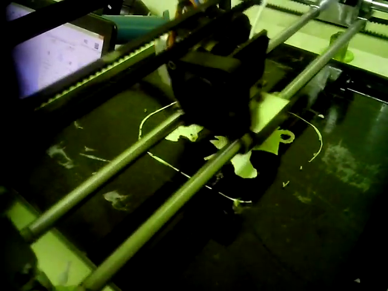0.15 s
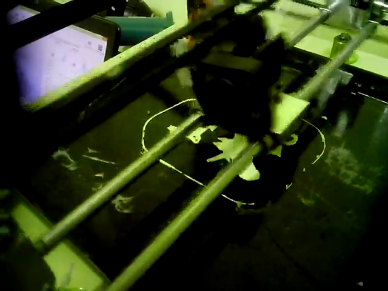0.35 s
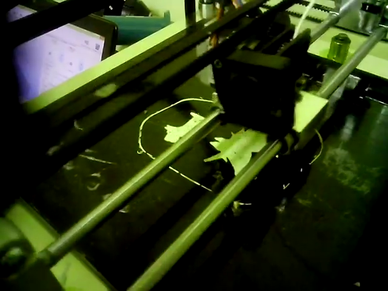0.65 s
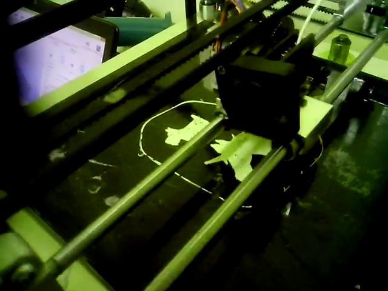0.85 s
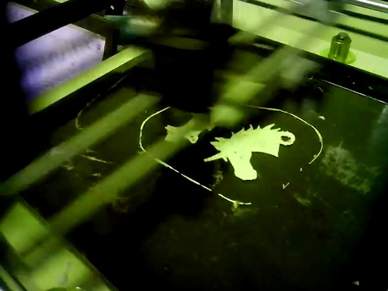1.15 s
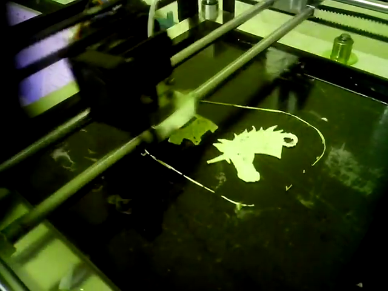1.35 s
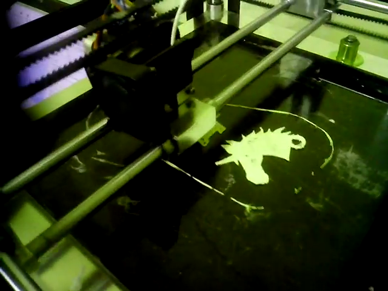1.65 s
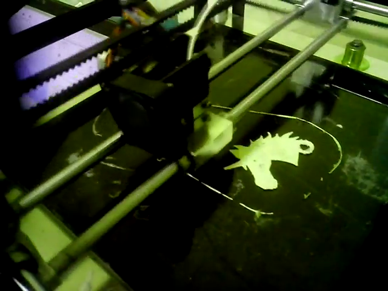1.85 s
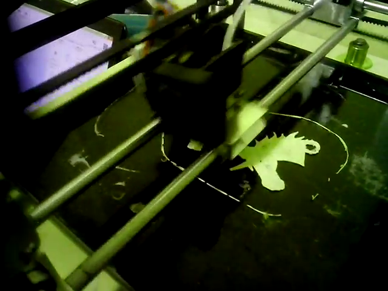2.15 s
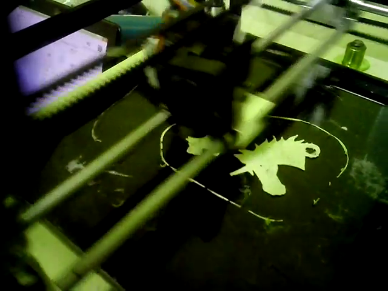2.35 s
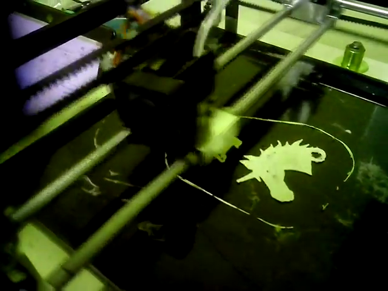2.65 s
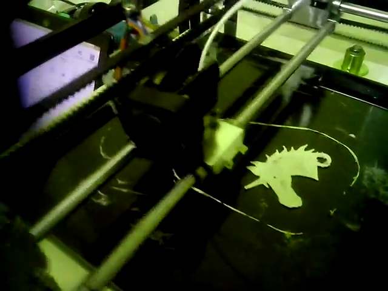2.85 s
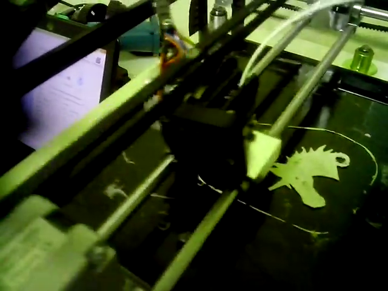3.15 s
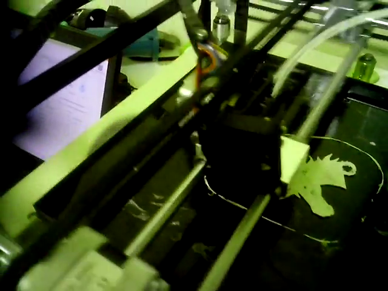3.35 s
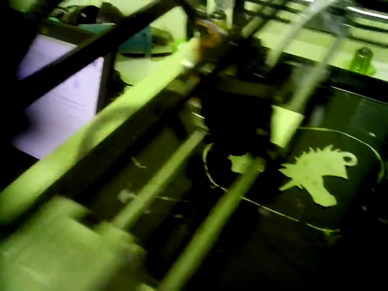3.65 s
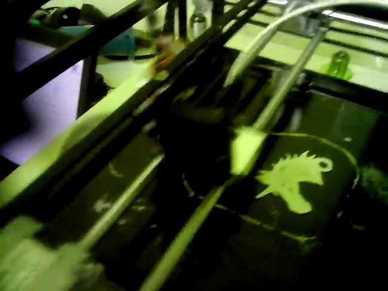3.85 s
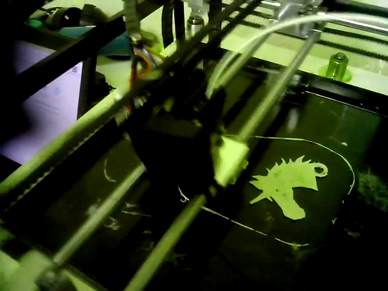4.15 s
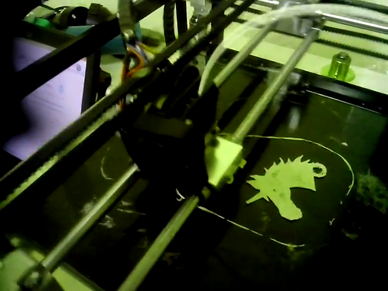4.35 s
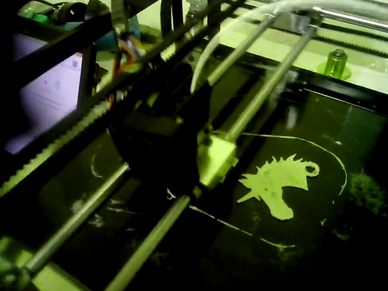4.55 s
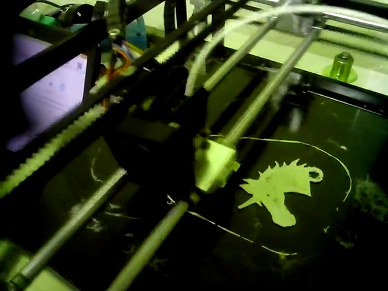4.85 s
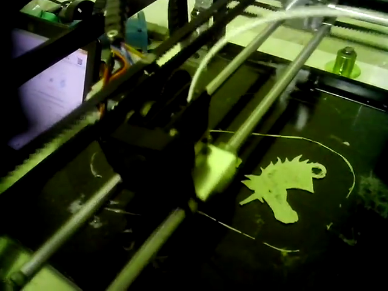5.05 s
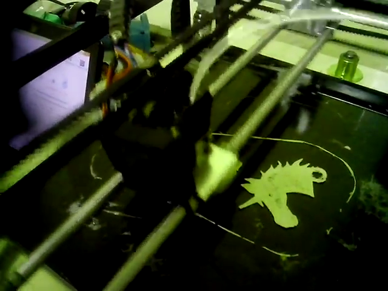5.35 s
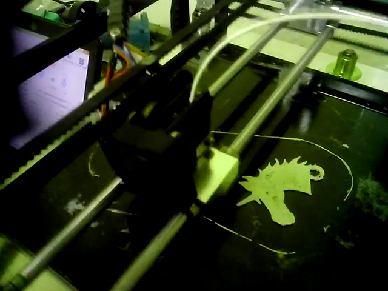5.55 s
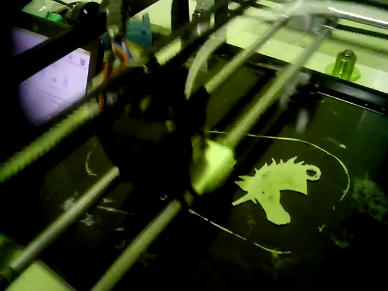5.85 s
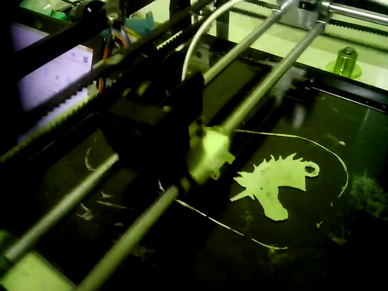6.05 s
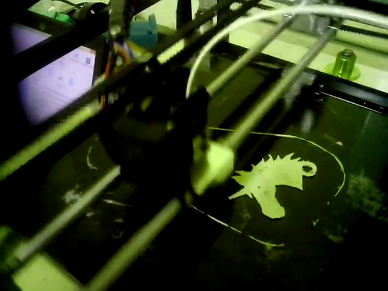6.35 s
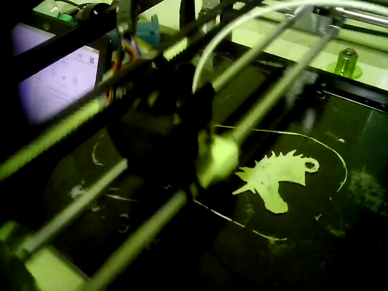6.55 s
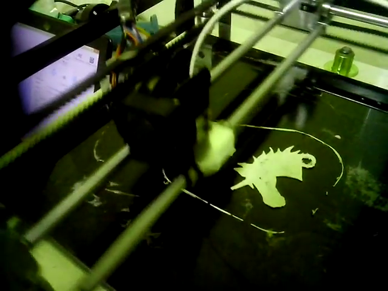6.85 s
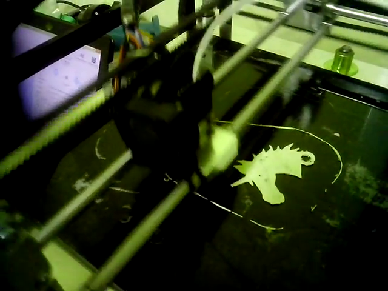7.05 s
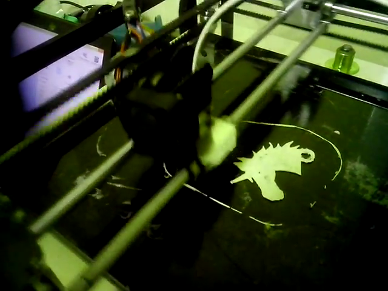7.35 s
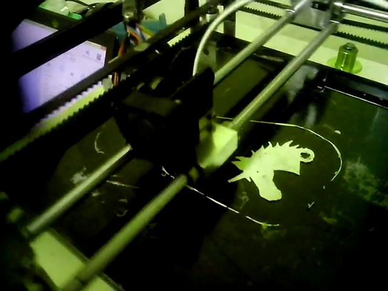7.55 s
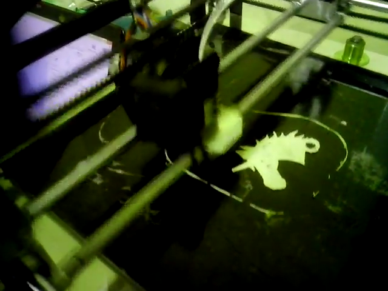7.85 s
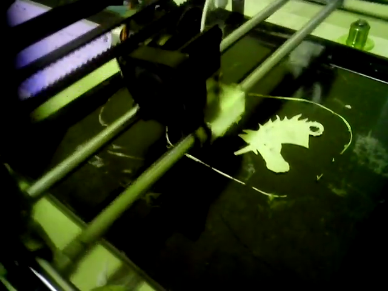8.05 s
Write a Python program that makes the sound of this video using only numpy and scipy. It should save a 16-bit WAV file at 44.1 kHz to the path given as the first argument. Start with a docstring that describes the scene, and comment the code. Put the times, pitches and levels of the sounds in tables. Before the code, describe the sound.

A 3D printer up close: motors whine and squeal in changing tones, the frame booms, the carriage knocks, over steady fan noise and low rumble.

```python
"""Over a steady fan and low rumble the frame of a 3D printer squeals and booms, close up in a small room.
Slow moves shake the frame's resonances, quicker ones whine as two motors step along curves.
High step harmonics squeal in the motor housing, and the carriage knocks in its play with short rings.
One fast travel move rasps and hisses; later the head zigzags to fill in a shape, each stroke a whine,
while the frame booms at some turns, where the head steps slowly sideways along the outline."""
import sys
import numpy as np
from scipy import signal
from scipy.fft import rfft, irfft, next_fast_len
from scipy.io import wavfile
from scipy.ndimage import uniform_filter1d

SR = 44100
rng = np.random.default_rng(int(sys.argv[2]) if len(sys.argv) > 2 else 0)


def wav_out(sig):
    """Save sig, one row per channel (or a flat mono array), as 16-bit PCM at SR to the path in sys.argv[1]."""
    wavfile.write(sys.argv[1], SR, np.round(np.clip(np.atleast_2d(sig).T, -1, 1) * 32767).astype(np.int16))


N = 362061
TIME = np.arange(N) / SR


def from_db(db):
    """Decibels to gain."""
    return 10 ** (np.asarray(db) / 20)


def rms_one(x):
    """Scale to rms 1."""
    return x / np.sqrt(np.mean(x ** 2) + 1e-20)


def in_time(rows):
    """Each column of an automation curve after the time, joined by straight lines."""
    s, *columns = np.transpose(rows)
    return [np.interp(TIME, s, column) for column in columns]


def drift(rate_hz):
    """Smooth random modulation of rms 1: noise through a two-pole lowpass, run at SR / 20."""
    pole = np.exp(-40 * np.pi * rate_hz / SR)
    noise = rng.standard_normal(N // 20 + 2002)
    slow = signal.lfilter([1], [1, -2 * pole, pole * pole], noise)[2000:]
    return np.interp(np.arange(N) / 20, np.arange(len(slow)), rms_one(slow))


def colour(x, spectrum):
    """EQ a sound to the spectrum of the body it passes through; rms 1."""
    size = next_fast_len(N + SR // 10)
    hz, db = np.transpose(spectrum)
    bins = np.maximum(np.arange(size // 2 + 1) * SR / size, 1)
    rolloff = 1 + (bins / hz[-1] / 2) ** 4
    gain = from_db(np.interp(np.log(bins), np.log(hz), db)) / rolloff
    return rms_one(irfft(rfft(x, size) * gain, size)[:N])


def ring(x, hz, t60):
    """A unit click sets a decaying sine of height 1 ringing."""
    r, w = from_db(-60 / (t60 * SR)), 2 * np.pi * hz / SR
    return signal.lfilter([0, np.sin(w)], [1, -2 * r * np.cos(w), r * r], x + 1e-18)


def resonance(x, hz, width_hz):
    """A bandpass resonance with gain 1 at its peak."""
    r = np.exp(-np.pi * width_hz / SR)
    feedback = [1, -2 * r * np.cos(2 * np.pi * hz / SR), r * r]
    return signal.lfilter(np.array([1, 0, -1]) * (1 - r * r) / 2, feedback, x + 1e-18)


def turning(hz):
    """Phase of a rotor stepping at this rate."""
    return 2 * np.pi * np.cumsum(hz) / SR


def grains(per_s, spread_db):
    """Random tiny contacts of uneven strength and either sign."""
    strength = from_db(spread_db * np.minimum(rng.exponential(1, N), 4))
    return (rng.random(N) < per_s / SR) * rng.choice([-1, 1], N) * strength


def gate(t, start, end, attack_s, release_s):
    """Attack, hold and release, half open at start and end."""
    return np.clip(np.minimum((t - start) / attack_s, (end - t) / release_s) + .5, 0, 1)


def held(rows, attack_s, release_s):
    """Envelope of a run of moves, each held at its own level; the louder wins where they overlap."""
    height = np.zeros(N)
    for s, length, db, *_ in rows:
        near = (TIME > s - attack_s) & (TIME < s + length + release_s)
        move = from_db(db) * gate(TIME[near], s, s + length, attack_s, release_s)
        height[near] = np.maximum(height[near], move)
    return height


def swells(rows):
    """Height and pitch of a run of moves, each swelling and fading about its middle."""
    power, pitch = np.full(N, 1e-12), np.full(N, 1e-12 * rows[0][2])
    for s, length, hz, db, glide_octaves_per_s in rows:
        near = slice(max(int((s - 2 * length) * SR), 0), int((s + 2 * length) * SR))
        bell = np.exp(-(2 * (TIME[near] - s) / length) ** 2)
        swell = (from_db(db) * bell) ** 2
        power[near] += swell
        pitch[near] += swell * hz * 2 ** (glide_octaves_per_s * (TIME[near] - s))
    return np.sqrt(power), pitch / power


def segments(per_s):
    """A clipped random value for each straight piece of a curve, held until the next."""
    piece = np.cumsum(rng.random(N) < per_s / SR)
    return uniform_filter1d(np.clip(rng.standard_normal(N), -2, 2)[piece], size=130)


ROOM_T60_S = 0.24


def room(x):
    """A short diffuse noise tail from the enclosure and the walls, with a 4 ms pre-delay."""
    age = TIME[:SR // 2]
    tail = rng.standard_normal(len(age)) * from_db(-60 * age / ROOM_T60_S) * (age > .004)
    return signal.fftconvolve(x, tail / np.sqrt(np.sum(tail ** 2)))[:N]


# steady fan noise, EQ curve: (frequency [Hz], relative level [dB])
FAN_SPECTRUM = [(100, -7), (300, 22.5), (800, 8.5), (1500, 9.5), (2500, -7), (3600, -3.5), (4320, 5),
                (4800, 2.5), (5700, 1), (6300, 2.5), (7100, -2), (7600, -18)]
# the fan's faint steady tones: (frequency [Hz], level [dB])
FAN_TONES = [(3698, -76.5), (4090, -69), (4333, -58)]
# slowest moves, which only make the frame rumble: (start [s], length [s], level [dB])
CRAWLS = [(0.327, 0.24, -33), (1.15, 0.1, -30), (1.83, 0.37, -36.5), (2.108, 0.34, -33.5),
          (2.838, 0.28, -35), (3.154, 0.17, -35), (3.378, 0.18, -33), (3.736, 0.13, -37.5),
          (4.282, 0.1, -33), (5.006, 0.15, -31)]
# floor of the frame's low rumble: (time [s], level [dB])
RUMBLE_FLOOR = [(0, -39), (1.0, -42), (1.65, -47), (1.95, -38.5), (4.0, -41.5), (5.5, -39.5), (7.0, -46),
                (7.8, -41), (8.2, -41.5)]
# frame rumble, EQ curve: (frequency [Hz], relative level [dB])
RUMBLE_SPECTRUM = [(25, -27.5), (68, -44.5), (88, -5.5), (106, -2), (130, -7.5), (156, 2.5), (195, -9),
                   (240, -10.5), (300, 3.5), (450, -37.5)]
# sliding of belts and bearings, before each layer's trim: (time [s], level [dB])
SLIDING = [(0, -36.5), (0.4, -41), (1.0, -37), (1.12, -62.5), (1.2, -33.5), (1.44, -36.5), (1.62, -37.5),
           (1.92, -50), (2.28, -34), (2.44, -44.5), (2.72, -35), (3.16, -40.5), (3.55, -37), (3.76, -39),
           (4.88, -41), (5.3, -47.5), (5.6, -37), (6.4, -41.5), (8.2, -37)]
# belt contacts, EQ curve: (frequency [Hz], relative level [dB])
BELT_SPECTRUM = [(340, -22.5), (385, 11), (440, -5), (490, -5.5), (540, -2), (577, 7.5), (620, -8.5),
                 (690, -3.5), (775, 4), (860, -10), (1200, -33)]
# ball bearings, EQ curve: (frequency [Hz], relative level [dB])
BEARING_SPECTRUM = [(500, -17), (760, 7.5), (950, -4.5), (1100, -0.5), (1330, -7), (1550, -21), (1700, 2),
                    (1950, -9.5), (2150, -12.5), (2500, -20), (4000, -16.5), (7000, -28)]
FAN_DB = -40.5
BELT_SPREAD_DB = 2.2  # unevenness of the belt's tooth contacts


def mechanism(crawl_db=0, attack_s=0.031, release_s=0.07, belt_db=-1.5,
              bearing_db=-45.5, bearing_per_db=1.49):
    """The frame rumbles on the slowest moves, belts and bearings follow the sliding; the fan blows steadily."""
    slide_db, = in_time(SLIDING)
    crawling = from_db(crawl_db) * held(CRAWLS, attack_s, release_s)
    shaking = np.maximum(crawling, from_db(in_time(RUMBLE_FLOOR)[0]))
    rumble = shaking * from_db(2.06 * drift(11.0)) * colour(grains(500, 1.5), RUMBLE_SPECTRUM)
    belt_level = from_db(slide_db + belt_db + 2 * drift(4))
    belt = belt_level * colour(grains(700, BELT_SPREAD_DB), BELT_SPECTRUM)
    # bearings swing further than the sliding itself
    swing_db = bearing_per_db * (slide_db - slide_db.mean())
    bearing_level = from_db(bearing_db + swing_db + 7.3 * np.tanh(drift(19)))
    bearings = bearing_level * colour(grains(1200, 1.5), BEARING_SPECTRUM)
    fan = from_db(FAN_DB) * colour(rng.standard_normal(N), FAN_SPECTRUM)
    tones = sum(from_db(db) * np.sin(turning(hz * (1 + 0.002004 * drift(9.2)))) for hz, db in FAN_TONES)
    return rumble + belt + bearings + fan + tones


# modes the carriage rings with, nominal: (frequency [Hz], relative level [dB], t60 [s])
CARRIAGE_MODES = [(1117, -6, 0.074), (1566, -7.5, 0.029), (1552, 2.5, 0.049), (1654.5, 4, 0.054),
                  (1754, 4, 0.032), (1990, -19, 0.022), (2125, -11.5, 0.12), (2247, -18.5, 0.18)]


def ticking(per_s, spread_db):
    """Small random contacts ring the carriage modes for half their nominal time; rms 1."""
    small = grains(per_s, spread_db)
    modes = [from_db(db) * ring(small, hz, t60 / 2) for hz, db, t60 in CARRIAGE_MODES]
    return rms_one(sum((-1) ** k * mode for k, mode in enumerate(modes)))


# the carriage knocks in its play: (time [s], strength before each layer's trim [dB])
KNOCKS = [(0.461, -24.5), (0.5252, -20.5), (0.567, -27), (0.633, -21.5), (0.9171, -22), (1.184, -24),
          (1.197, -10), (1.205, -12.5), (1.217, -21), (1.912, -18), (1.938, -25), (1.996, -17),
          (2.028, -26), (2.104, -13.5), (2.1913, -29), (2.2063, -20), (2.2487, -17.5), (2.2867, -12),
          (2.341, -20), (2.386, -9.5), (2.427, -22), (2.5322, -22.5), (2.576, -21.5), (2.628, -18),
          (2.696, -20), (2.7627, -24.5), (2.8883, -23), (2.938, -25), (2.9634, -20.5), (3.0423, -15.5),
          (3.1, -23), (3.118, -25), (3.2102, -21), (3.265, -19.5), (3.3448, -23.5), (3.459, -23),
          (3.518, -25), (3.6196, -16.5), (3.6606, -14.5), (3.72, -38), (3.8128, -17), (3.864, -22),
          (3.929, -28), (4.0042, -22.5), (4.148, -22), (4.1799, -24.5), (4.289, -35.5), (4.348, -24.5),
          (4.369, -18), (4.4066, -14.5), (4.4682, -10.5), (4.5012, -18.5), (4.523, -17.5), (4.6232, -22),
          (4.784, -26.5), (4.9232, -17.5), (5.023, -24), (5.0483, -15.5), (5.0653, -15), (5.0817, -16.5),
          (5.0988, -17.5), (5.206, -12.5), (5.2596, -20), (5.3724, -22), (5.4222, -16.5), (5.483, -27),
          (5.671, -23.5), (6.212, -32)]
# high ring of steel rods and bearings in a hard knock, EQ curve: (frequency [Hz], relative level [dB])
CRACK_SPECTRUM = [(500, -22.5), (1700, 4.5), (2600, -13.5), (2950, 12), (3500, -2.5), (4150, 9.5),
                  (4700, 1.5), (5200, 5), (5700, -3.5), (7000, -13)]
# small ticks of loose parts: (time [s], level [dB])
TICKS = [(0, -55.5), (1.8, -43.5), (2.0, -43), (2.9, -49.5), (3.9, -48), (4.5, -40), (5.2, -49),
         (5.8, -52.5), (8.2, -45.5)]
CONTACT_S, MODE_SPREAD_DB, MODE_DETUNE = .0012, 3.5, .014  # detune as a share of the mode's pitch
DAMPING = (.55, 1.1)  # range of a knock's ring time, as a share of the modes' own
REBOUND_S, REBOUND_SHARE = (.003, .009), .35  # delay range and strength of the second contact


def knocks(level_db=-10.5, ring_on_db=-24, ring_on_t60_s=0.38, crack_db=-22, hard_db=-12,
           crack_per_db=0.76, crack_s=0.018, crack_rise_s=0.0012, chatter_db=-21, chatter_s=0.029):
    """Quick double contacts ring the carriage with a dry crack; loose parts chatter after them and tick."""
    age = TIME[:SR // 6]
    out, cracks, shaken = np.zeros((3, N + SR))
    hz, mode_db, t60 = np.transpose(CARRIAGE_MODES)[:, :, None]
    crack = np.exp(-age / crack_s) * (1 - np.exp(-age / crack_rise_s))
    for s, db in KNOCKS:
        span = slice(int(s * SR), int(s * SR) + len(age))
        # each contact point weights, damps and detunes the modes anew
        ring_on = from_db(ring_on_db - 60 * age / ring_on_t60_s)
        decay = from_db(-60 * age / (t60 * rng.uniform(*DAMPING))) + ring_on
        gain = from_db(mode_db + MODE_SPREAD_DB * rng.standard_normal(hz.shape))
        gain = gain * rng.choice([-1, 1], hz.shape)
        detuned_hz = hz * (1 + MODE_DETUNE * rng.standard_normal(hz.shape))
        modes = gain * decay * np.sin(2 * np.pi * detuned_hz * age)
        rebound = np.maximum(age - rng.uniform(*REBOUND_S), 0)
        contacts = sum(share * np.sqrt(t) * np.exp(-t / CONTACT_S)
                       for t, share in ((age, 1), (rebound, REBOUND_SHARE)))
        blow = rng.standard_normal(len(age)) * contacts
        knock = signal.fftconvolve(blow, modes.sum(0))[:len(age)]
        # level is set over the first 20 ms
        out[span] += from_db(db + level_db) * knock / knock[age < .02].std()
        # hard blows are brighter
        cracks[span] += from_db(db + crack_db + crack_per_db * (db - hard_db)) * crack
        shaken[span] += from_db(db + chatter_db) * np.exp(-age / chatter_s)
    chatter = shaken[:N] * ticking(per_s=220, spread_db=1.7)
    ticks = from_db(in_time(TICKS)[0]) * ticking(per_s=110, spread_db=4.0)
    return out[:N] + cracks[:N] * colour(grains(2500, 1.4), CRACK_SPECTRUM) + chatter + ticks


# the fast travel move, in two legs: (time [s], middle step rate [Hz], whine level [dB])
TRAVEL = [(1.14, 897, -37), (1.205, 1483, -28), (1.249, 1100, -32), (1.303, 901, -32.5), (1.345, 1900, -38),
          (1.37, 4140, -21.5), (1.394, 3790, -38), (1.435, 1600, -42), (1.467, 708, -19.5)]
# bearing rasp, EQ curve: (frequency [Hz], relative level [dB])
RASP_SPECTRUM = [(150, -22), (700, -8), (1080, 7), (1350, 6.5), (1650, 10), (2300, -3.5), (2700, -16),
                 (4200, -1), (5500, -32), (7200, -11.5)]
# belt hiss, loudest at top speed in each leg: (time [s], middle level [dB])
TRAVEL_HISS = [(1.13, -55), (1.16, -38), (1.183, -48), (1.2, -27.5), (1.225, -46), (1.29, -57), (1.34, -31),
               (1.375, -31.5), (1.43, -33), (1.49, -67)]
# belt hiss, EQ curve: (frequency [Hz], relative level [dB])
BELT_HISS_SPECTRUM = [(1500, -33), (3200, 8.5), (3800, 7), (4300, 19), (4800, 7), (5700, 16), (7000, -6)]


def travel(wander=0.077, grit=0.32, rasp_db=-31, attack_s=.004, release_s=0.014):
    """A rough whine sweeps up and down, the bearings rasp, and the belts hiss at top speed."""
    hz, whine_db = in_time(TRAVEL)
    tone = np.sin(turning(hz * (1 + wander * drift(302))))
    whine = from_db(whine_db) * tone * (1 + grit * drift(580))
    rasp = from_db(rasp_db) * colour(grains(900, 1.6), RASP_SPECTRUM)
    hiss_level = from_db(in_time(TRAVEL_HISS)[0] + 2 * drift(120))
    hiss = hiss_level * colour(grains(3500, 1.6), BELT_HISS_SPECTRUM)
    return gate(TIME, TRAVEL[0][0], TRAVEL[-1][0], attack_s, release_s) * (whine + rasp + hiss)


def housing(centre_hz, wander=0.022, grit=0.93):
    """Step harmonics of two motors skid over the housing's close modes; rms 1."""
    tones = sum(np.sin(turning(centre_hz * (1 + wander * drift(25.115)))) for motor in range(2))
    return rms_one(tones * (1 + grit * drift(600)))


# step harmonics ringing in the housing: (start [s], length [s], level before trim [dB], centre [Hz])
SQUEALS = [(0.145, 0.0542, -42, 6325), (0.766, 0.0851, -37, 6490), (1.147, 0.09, -41, 6420),
           (1.317, 0.11, -41, 6700), (1.52, 0.0751, -36.5, 6792), (2.335, 0.098, -37.5, 6506),
           (2.505, 0.041, -35, 6345), (2.761, 0.155, -40.5, 6420), (3.11, 0.1, -40.5, 6395),
           (3.351, 0.117, -38.5, 6187), (3.54, 0.08, -40.5, 6450), (3.633, 0.055, -34, 6573),
           (4.01, 0.125, -37.5, 6415), (4.35, 0.063, -41.5, 6360), (4.524, 0.05, -38, 6310),
           (4.586, 0.19, -46, 6300), (4.916, 0.05, -41.5, 6380), (5.148, 0.043, -36, 6600),
           (5.226, 0.024, -37, 6260), (5.286, 0.046, -37.5, 6240), (5.393, 0.032, -38, 6380),
           (5.47, 0.047, -38.5, 6300)]
SQUEAL_CHOP_DB = 2.6


def squeals(level_db=-0.5, attack_s=0.048, release_s=0.042, faint_db=-51, faint_swing_db=5):
    """Thin squeals, chopped by the changes of speed; faint ones come and go along the outlines."""
    centres = [(s + part * length, hz) for s, length, db, hz in SQUEALS for part in (0, 1)]
    hz, = in_time(centres)
    outlining = TIME < ZIGZAGS[0][0]
    faint = from_db(faint_db + faint_swing_db * np.tanh(drift(9.5))) * outlining
    height = np.maximum(held(SQUEALS, attack_s, release_s), faint)
    return height * from_db(level_db + SQUEAL_CHOP_DB * drift(33)) * housing(hz)


# quicker moves along curved outlines, before each motor's ratio and trim:
# (middle [s], length [s], step rate [Hz], height [dB], glide [octaves/s])
QUICK_MOVES = [(1.02, 0.089, 610, -33.5, -1.5), (1.235, 0.08, 992, -28, 1.5), (1.46, 0.06, 820, -25, -5),
               (1.667, 0.055, 947.8, -25.5, 1.5), (1.715, 0.046, 1780, -36.5, 1.5),
               (2.231, 0.018, 809, -19, -3.5), (2.278, 0.048, 856, -22.5, 3), (2.356, 0.03, 826, -28, 0),
               (2.58, 0.026, 848, -30, 12), (2.62, 0.054, 1060, -22, -3), (2.67, 0.038, 812, -23.5, -6),
               (2.7, 0.027, 1038, -28, 9.5), (2.74, 0.035, 819, -24.5, 0), (2.895, 0.14, 863, -29.5, 2),
               (3.25, 0.055, 717, -33.5, -5), (3.505, 0.058, 842, -24.5, 5.5),
               (3.845, 0.061, 1090, -25, -3.5), (3.89, 0.086, 866, -27, -10), (3.996, 0.049, 826, -27, 2),
               (4.163, 0.061, 955, -26.5, 1), (5.105, 0.081, 852, -27.5, -6.5)]
# curves are cut into straight segments; step rate (as a share) and level jump between them
SEGMENTS_PER_S, RATE_JUMP, RATE_SHUDDER, LEVEL_JUMP_DB = 80, .05, .012, 3.5


def quick_moves(other_ratio=.88, level_db=-3, second_db=-14, other_db=-7):
    """Two motors share a curve, their step rates and strengths jumping from segment to segment."""
    height, hz = swells(QUICK_MOVES)
    motors = 0
    for ratio, share in ((1.02, 1), (other_ratio, from_db(other_db))):
        jumping = 1 + RATE_JUMP * segments(SEGMENTS_PER_S) + RATE_SHUDDER * drift(220)
        phase = turning(hz * ratio * jumping)
        strength = share * from_db(LEVEL_JUMP_DB * segments(SEGMENTS_PER_S))
        motors = motors + strength * (np.sin(phase) + from_db(second_db) * np.sin(2 * phase))
    return height * from_db(level_db) * motors


GLIDE_WANDER = .025  # share of the step rate


def glide(points):
    """A step tone that follows one slow move, shuddering as it goes."""
    hz, db = in_time(points)
    return from_db(db + 2 * drift(61)) * np.sin(turning(hz * (1 + GLIDE_WANDER * drift(90))))


# slow moves, whose steps set the frame booming: (start [s], length [s], level before trim [dB])
SLOW_MOVES = [(0.17, 0.09, -26.5), (0.285, 0.035, -29), (0.385, 0.023, -23), (0.446, 0.057, -23),
              (0.567, 0.034, -25.5), (0.605, 0.061, -28), (0.677, 0.056, -27), (0.752, 0.019, -23),
              (0.978, 0.048, -27.5), (1.16, 0.079, -26), (1.445, 0.15, -23.5), (1.798, 0.099, -26.5),
              (1.93, 0.19, -25.5), (1.998, 0.044, -20), (2.185, 0.037, -24), (2.442, 0.048, -27),
              (2.707, 0.323, -26), (3.055, 0.17, -26), (3.338, 0.032, -27), (3.411, 0.066, -27),
              (3.645, 0.077, -27), (3.955, 0.18, -23.5), (4.174, 0.13, -26), (4.31, 0.035, -26),
              (4.385, 0.17, -25.5), (4.559, 0.058, -23), (4.65, 0.046, -26.5), (4.705, 0.05, -28.5),
              (4.754, 0.053, -24.5), (4.849, 0.11, -24), (4.972, 0.035, -18.5), (5.044, 0.035, -22),
              (5.11, 0.064, -29), (5.212, 0.04, -18), (5.25, 0.065, -25.5), (5.367, 0.031, -25.5),
              (5.445, 0.043, -27.5), (5.515, 0.028, -24.5), (5.745, 0.054, -23.5), (5.81, 0.14, -23.5),
              (5.98, 0.074, -24), (6.05, 0.16, -26.5), (6.288, 0.062, -22.5), (6.475, 0.058, -27.5),
              (6.67, 0.05, -28), (6.99, 0.063, -29.5), (7.067, 0.029, -19), (7.11, 0.032, -24.5),
              (7.275, 0.021, -24), (7.4, 0.08, -30.5), (7.57, 0.069, -27.5), (7.712, 0.051, -16.5),
              (7.755, 0.1, -29), (7.86, 0.051, -19), (7.905, 0.03, -22), (8.003, 0.039, -20.5)]
# the frame's other resonances: (frequency [Hz], width of first filter pass [Hz], relative level [dB])
FRAME_MODES = [(301.4, 22.6, -6), (353, 13, -9.5), (397.6, 10, -15.5), (589, 16, -22.5)]
# moves that glide through the frame's resonances, each a list of:
# (time [s], middle step rate [Hz], middle level [dB])
GLIDES = [
    [(1.36, 147.9, -74), (1.4, 178.3, -32.5), (1.46, 266.7, -21.5), (1.56, 367, -32), (1.63, 336, -25.5),
     (1.72, 293, -64)],
    [(2.69, 288, -72), (2.71, 292.3, -28), (2.81, 363.5, -26.5), (2.86, 300, -23.5), (2.93, 383.4, -31.5),
     (3.0, 273.3, -19), (3.05, 366, -28.5), (3.1, 336, -78)],
]
# step tone of the slow moves: middle rate and how far it strays on curves
GROWL_HZ, GROWL_OCTAVES, GROWL_DB = 320, .5, -8
BOOM_SWING = .2  # share of the main tone's height


def slow_moves(level_db=-2, main_hz=283, main_wander=0.012, attack_s=0.038, release_s=0.041,
               segments_db=-1.64, idle_db=-41, second_db=-10):
    """Steps shake the frame: its main mode sings almost purely, and on curves the step tone growls."""
    outline = held(SLOW_MOVES, attack_s, release_s) * from_db(level_db + segments_db * drift(3.1))
    main_phase = turning(main_hz * (1 + main_wander * drift(27.0)))
    boom = np.sqrt(2) * np.sin(main_phase) * (1 + BOOM_SWING * drift(28))
    for hz, width, db in FRAME_MODES:
        once = resonance(rng.standard_normal(N), hz, width)
        boom = boom + from_db(db) * rms_one(resonance(once, hz, 2 * width))
    curving = TIME < ZIGZAGS[0][0]
    step = turning(GROWL_HZ * 2 ** (GROWL_OCTAVES * np.tanh(drift(9))))
    growl_tone = np.sin(step) + from_db(second_db) * np.sin(2 * step)
    growl = curving * outline * from_db(GROWL_DB) * growl_tone
    height = np.sqrt(outline ** 2 + from_db(idle_db) ** 2)
    return height * boom + sum(glide(points) for points in GLIDES) + growl


# the zigzag crosses three parts of the shape:
# (start [s], first time from stroke to stroke [s], its growth [s per stroke])
ZIGZAGS = [(5.519, .059, .0007), (6.213, .0985, -.0004), (7.007, .0874, -.00158)]
TURN_S = 0.018  # pause between strokes


def strokes():
    """Start and end of every zigzag stroke; they grow or shrink with the width of the shape."""
    out = []
    limits = [row[0] for row in ZIGZAGS[1:]] + [N / SR]
    for (s, period, growth), limit in zip(ZIGZAGS, limits):
        while s + period / 2 < limit and period > TURN_S:
            out.append((s, s + period - TURN_S))
            s, period = s + period, period + growth
    return out


# step rate at the turning points: (time [s], rate [Hz])
TURN_HZ = [(5.52, 709.4), (5.95, 748.4)]
# how strongly the zigzag whines, before each layer's trim: (time [s], level [dB])
ZIGZAG_LEVEL = [(5.52, -34), (5.65, -27), (5.85, -24.5), (6.1, -24), (6.31, -22.5), (6.92, -24.5),
                (7.05, -27), (7.43, -27), (7.74, -28), (8.2, -27.5)]
# guide rods, which ring on through each turn: (frequency [Hz], width [Hz], level [dB])
RODS = [(772, 11, 0.5), (874, 11, -5)]
FEED_HZ = 868  # step rate at full printing speed
ACCELERATION_HZ_PER_S, BRAKING_HZ_PER_S = 9300, 4500  # how fast full speed is reached and left
STROKE_RAMP_S = 0.016  # rise and fall of each stroke
DIRECTION_DB = 1.4  # strokes one way are louder, the other way softer
SPEED_JITTER, BUILD_UP_DB = .001, 3  # waver as a share of speed; dB of growth per whole stroke
WHINE_SHUDDER, OTHER_MOTOR_SWING_DB = .18, 3.5


def infill(whine_db=-5, second_db=-19, eighth_db=-13, squeal_db=-37, fade_db_per_s=-2,
           squeal_sag_db=-9, other_db=-10.5):
    """Each stroke leaps to speed, cruises as its vibration builds up, and brakes through the rods' modes."""
    hz, = in_time(TURN_HZ)
    height, squealing = np.zeros(N), np.zeros(N)
    for k, (start, end) in enumerate(strokes()):
        span = slice(int(start * SR), int(end * SR))
        since, until = TIME[span] - start, end - TIME[span]
        done = since / (end - start)
        speed_up = np.minimum(ACCELERATION_HZ_PER_S * since, BRAKING_HZ_PER_S * until)
        hz[span] = np.minimum(hz[span] + speed_up, FEED_HZ)
        # the build-up stops at 70 % of the stroke
        db = whine_db + DIRECTION_DB * (-1) ** k + BUILD_UP_DB * np.clip(done, 0, .7)
        height[span] = from_db(db) * np.clip(np.minimum(since, until) / STROKE_RAMP_S, 0, 1)
        squealing[span] = from_db(squeal_sag_db * done ** 2)
    height = uniform_filter1d(height, size=300) * from_db(in_time(ZIGZAG_LEVEL)[0])
    squealing = uniform_filter1d(squealing, size=300)
    cruising = uniform_filter1d(1. * (hz >= FEED_HZ), size=500)

    phase = turning(hz * (1 + SPEED_JITTER * drift(23)))
    second = from_db(second_db + 7.1 * drift(25)) * np.sin(2 * phase)
    whine = height * (1 + WHINE_SHUDDER * drift(90)) * (np.sin(phase) + second)
    other_level = height * from_db(other_db + OTHER_MOTOR_SWING_DB * drift(40))
    other_motor = other_level * np.sin(turning(hz * .92 * (1 + 0.022 * drift(80))))
    rods = sum(from_db(db) * resonance(whine + other_motor, f, width) for f, width, db in RODS)
    # the eighth step harmonic whistles at full speed
    whistle = from_db(eighth_db) * height * cruising * np.sin(8 * phase)
    fading_db = fade_db_per_s * (TIME - ZIGZAGS[0][0])
    squeal_level = from_db(squeal_db + fading_db + 2 * drift(46)) * squealing
    squeal = squeal_level * housing(6350, wander=0.011, grit=0.63)
    return whine + other_motor + rods + whistle + squeal


def scene(motor_room_db=-12, knock_room_db=-9):
    """Mix motors, knocks and running noise; only quicker motors and knocks feed the room."""
    motors = quick_moves() + squeals() + infill() + travel()
    rattle = knocks()
    echo = room(from_db(motor_room_db) * motors + from_db(knock_room_db) * rattle)
    return (slow_moves() + motors + rattle + mechanism() + echo)[None]


CUTOFF_HZ = 7550


def record(dry):
    """A steep elliptic lowpass, its passband ending 200 Hz below the cutoff, takes off the top."""
    lowpass = signal.ellip(10, .3, 80, CUTOFF_HZ - 200, fs=SR, output="sos")
    return signal.sosfilt(lowpass, dry)


dry = scene()
out = record(dry)
wav_out(out)
```